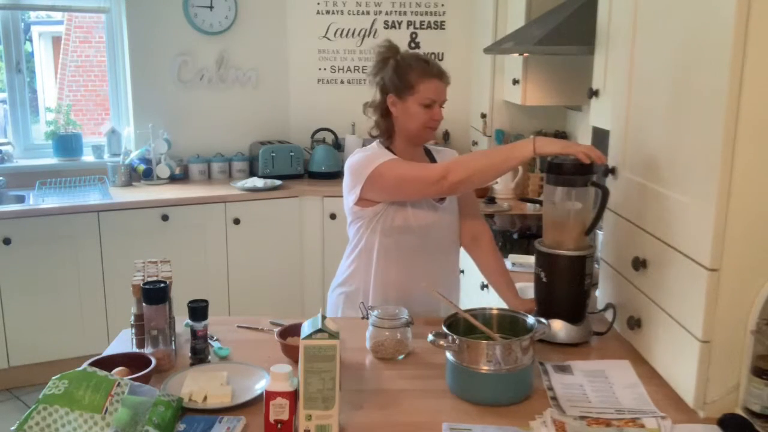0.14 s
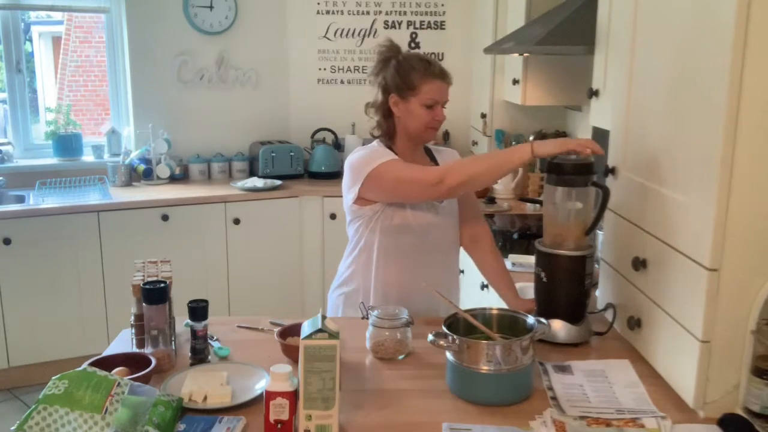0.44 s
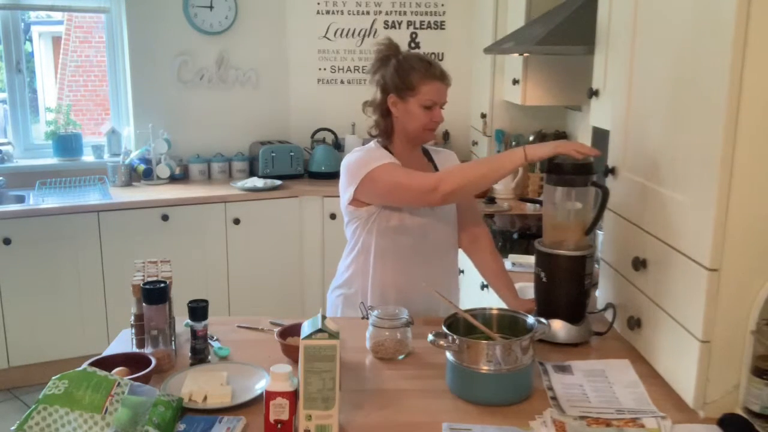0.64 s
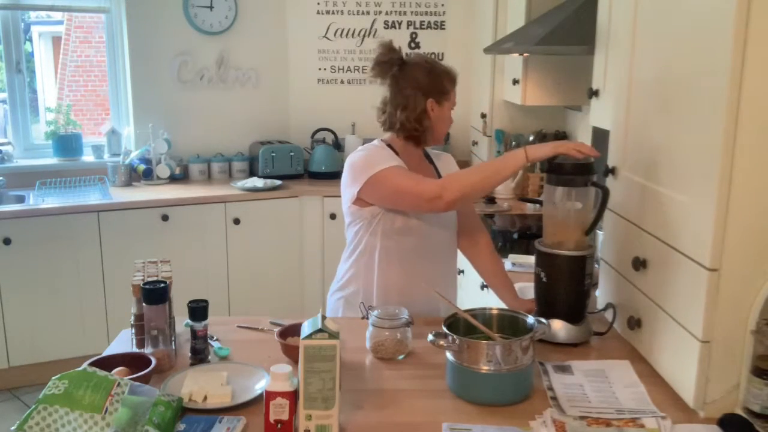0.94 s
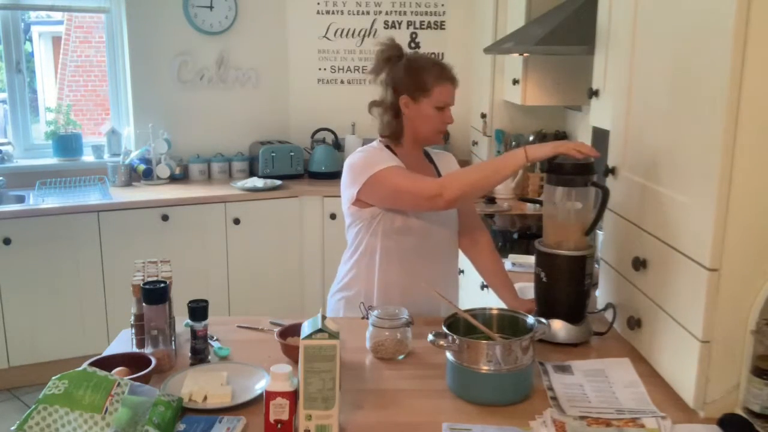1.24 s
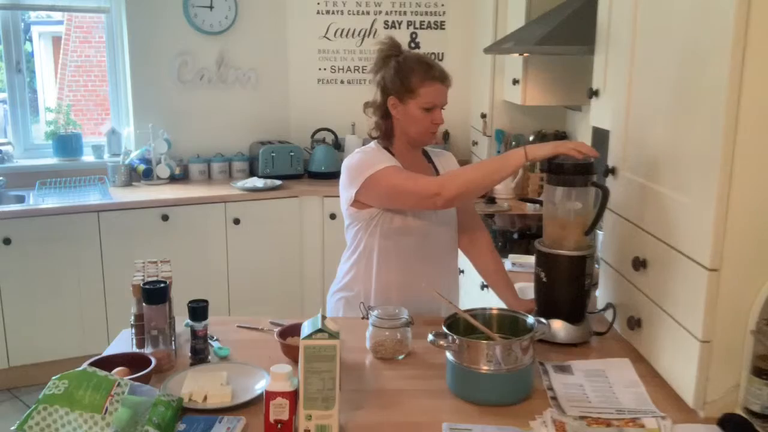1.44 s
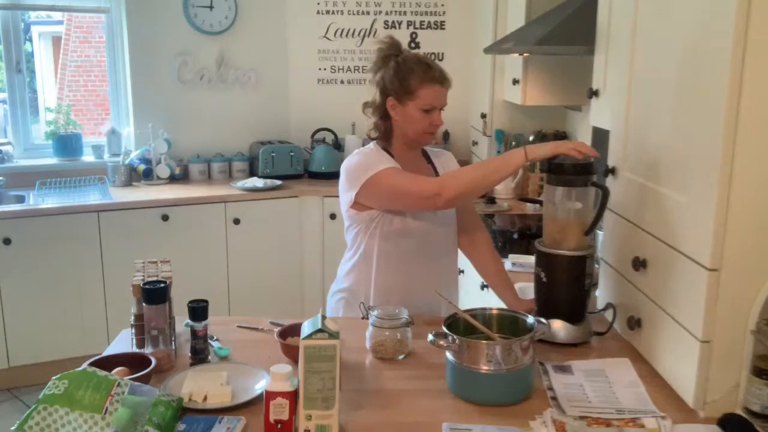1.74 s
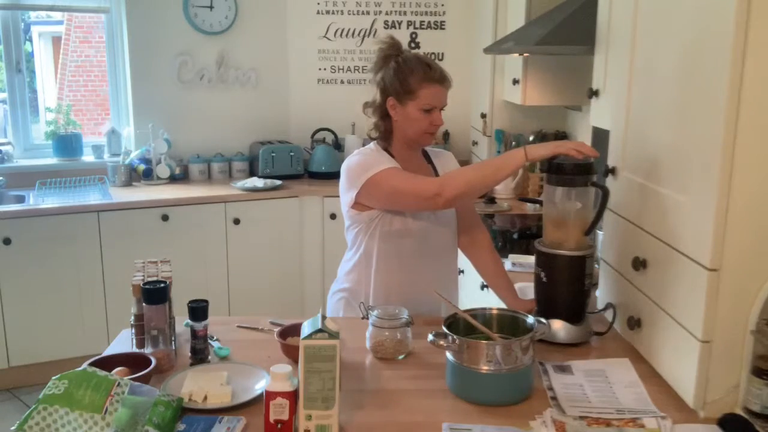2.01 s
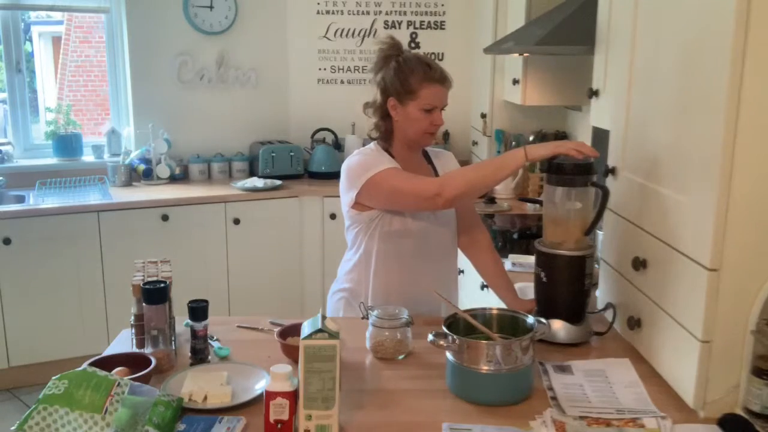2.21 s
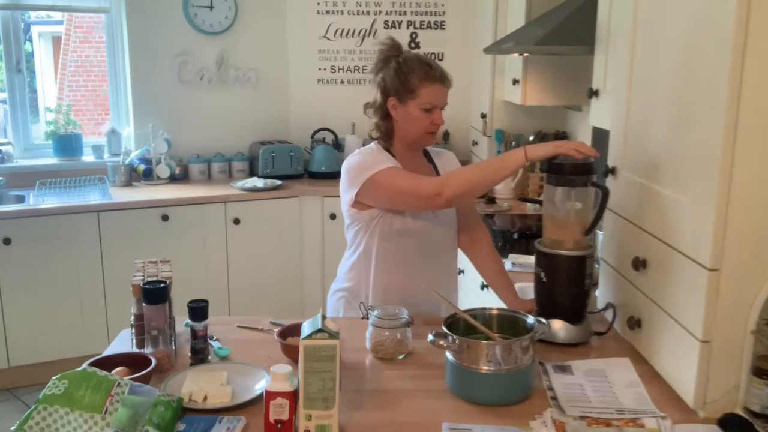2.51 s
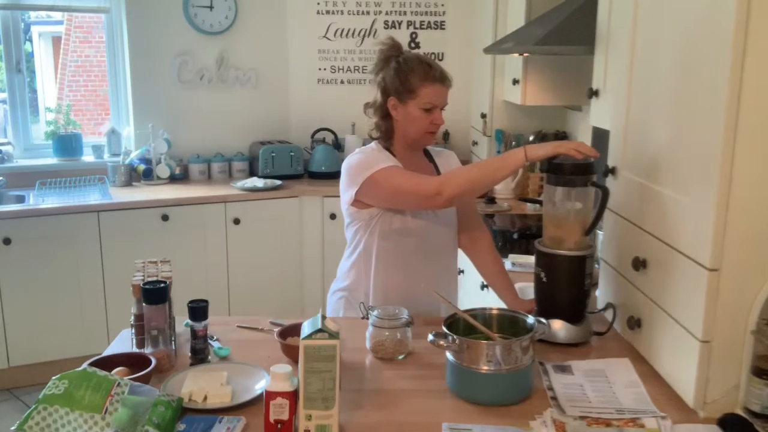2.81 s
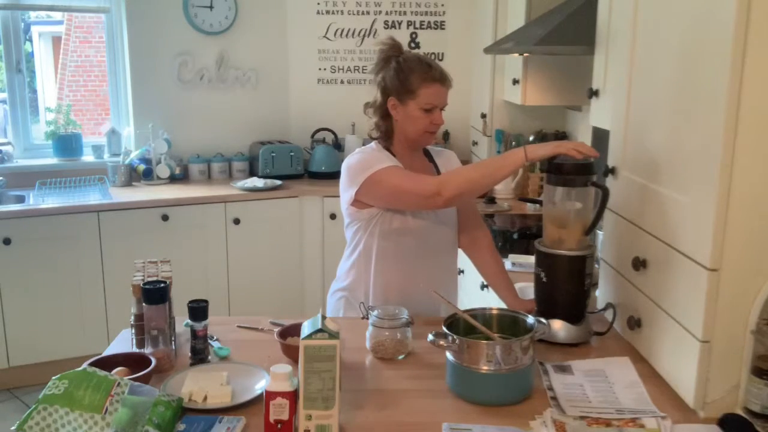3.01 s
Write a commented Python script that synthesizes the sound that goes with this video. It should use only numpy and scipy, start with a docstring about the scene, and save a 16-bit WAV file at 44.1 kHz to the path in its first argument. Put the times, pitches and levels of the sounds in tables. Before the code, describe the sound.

A kitchen blender grinds dry seeds: its whine flutters raggedly and rises in pitch during the first second, then holds nearly steady over rushing air and gritty rattle, heard in stereo in a small room.

```python
"""Small blender grinding dry seeds

A blender runs up to full speed in a kitchen; its blades whine as a fluttering sine with three overtones.
The motor adds thinner fading tones and a high whistle, all locked to the same changing speed.
Shaped noise makes the rush of air and fine meal; random clicks make the coarse seeds, loudest at first.
Two fading low tones hum faintly underneath, and one soft low thud is a short dying sine.
"""
import sys
import numpy as np
from scipy import signal
from scipy.fft import rfft, irfft
from scipy.io import wavfile

SR = 44100
rng = np.random.default_rng(int(sys.argv[2]) if len(sys.argv) > 2 else 0)


def wav_out(sig):
    """Save sig, one row per channel (or a flat mono array), as 16-bit PCM at SR to the path in sys.argv[1]."""
    wavfile.write(sys.argv[1], SR, np.round(np.clip(np.atleast_2d(sig).T, -1, 1) * 32767).astype(np.int16))


N = 138915  # length in samples

# The shifting load makes the speed waver. Each row: time in seconds, pitch added to the whine in Hz.
LOAD_WAVER = [(.98, 0), (1.09, 1.8), (1.16, -1.4), (1.65, -.8), (1.73, 3.2), (1.82, 0), (1.96, -4.2),
              (2.13, 1.4), (2.18, -2.4), (2.33, -2.5), (2.53, 2), (2.79, -3.8), (2.85, -.2), (2.94, .9),
              (3.05, -3.8), (3.11, 1)]
START_HZ, FREE_HZ, HELD_HZ = 735, 857.5, 849.3  # pitch at the start, free-running, and once held
SPIN_UP_S = .385  # time constant of the rise
JITTER_HZ, JITTER_PER_S = .45, 16


def spin_up():
    """Pitch of the whine in Hz: it rises ever slower towards free running, is held, and wavers."""
    t = np.arange(N) / SR
    rise = FREE_HZ - (FREE_HZ - START_HZ) * np.exp(-t / SPIN_UP_S)
    held = np.minimum(rise, HELD_HZ)
    return held + in_time(LOAD_WAVER) + JITTER_HZ * drift(JITTER_PER_S)


# Loudness of the whine. Each row: time in seconds, rms level in dB.
WHINE_LEVEL = [(0, -32), (.028, -30.5), (.05, -38), (.072, -46), (.1, -39), (.118, -31), (.15, -29.3),
               (.185, -34), (.213, -48), (.245, -30), (.35, -26.5), (.55, -24.8), (.62, -26.5), (.665, -30),
               (.74, -28.5), (.81, -32.5), (1.07, -30), (2.0, -31.4), (2.5, -30.2), (3.15, -30.6)]
# The whine's place shifts with its pitch. Each row: pitch in Hz, left minus right in dB.
WHINE_PAN = [(735, -.3), (835, 1.2), (840, -1.6), (846.5, 0), (848.3, 3.4)]
# Loudness of its second, third and fourth harmonics. Each row: time in seconds, rms level in dB.
OCTAVE_LEVEL = [(0, -49), (.46, -44), (.7, -37.5), (.93, -38), (1.03, -53), (1.6, -56), (2.0, -47),
                (3.15, -48.5)]
THIRD_LEVEL = [(0, -44), (.33, -47), (.42, -37), (.5, -44), (.9, -57), (1.02, -42.5), (1.5, -44),
               (3.15, -43.5)]
FOURTH_LEVEL = [(.73, -56), (.8, -44), (.95, -43), (1.1, -48), (1.25, -55), (3.15, -51.5)]
OCTAVE_PAN_DB, THIRD_PAN_DB, FOURTH_PAN_DB = -0.5, -4, -5  # left minus right
WHINE_FLUTTER, FLUTTER_PER_S = 0.058, 35  # lasting depth as a share of the level, and its rate
START_FLUTTER, SETTLE_S = .35, .17  # extra depth: the whine flutters more raggedly during the run-up
OVERTONE_UNSTEADY, OVERTONE_FADES_PER_S = .55, 24


def blades(speed, phase):
    """The blades sound one strong sine, fluttering at random, most strongly at first, with harmonics."""
    t = np.arange(N) / SR
    depth = WHINE_FLUTTER + START_FLUTTER * np.exp(-(t / SETTLE_S) ** 2)
    common = drift(FLUTTER_PER_S)
    each_side = np.array([drift(FLUTTER_PER_S), drift(FLUTTER_PER_S)])
    flutter = 1 + depth * (common + .4 * each_side)
    whine = rms_one(flutter * np.sin(phase))
    out = whine * from_db(in_time(WHINE_LEVEL)) * panned(at_hz(WHINE_PAN, speed))
    overtones = [(2, OCTAVE_LEVEL, OCTAVE_PAN_DB), (3, THIRD_LEVEL, THIRD_PAN_DB),
                 (4, FOURTH_LEVEL, FOURTH_PAN_DB)]
    for harmonic, level, pan_db in overtones:
        tone = unsteady_tone(harmonic * phase, OVERTONE_UNSTEADY, OVERTONE_FADES_PER_S)
        out = out + tone * from_db(in_time(level)) * panned(pan_db)
    return out


# Thinner motor tones. Each row: multiple of the whine's pitch, rms level in dB at the held speed,
# left minus right in dB, unsteadiness from 0 to 1 (anything over 0.75 acts as 0.75).
MOTOR_LINES = [(.875, -57.5, 8, 0.9), (1.04, -53, -14, 1), (1.255, -58.5, -28, 0.88), (1.405, -56, 7, 1),
               (1.7555, -46, 5.5, 0.46), (1.7468, -49.5, -6, 1), (2.603, -47.5, 0, 0.9),
               (3.452, -50.5, 2, 1), (5.395, -61.5, -12, 1), (10.26, -51.5, -3, .9), (13.01, -53.5, -27, 1),
               (17.585, -56, 1, 0.7)]
LINE_FADES_PER_S = 15
MOTOR_DB_PER_HZ = 0.26  # the tones grow as the speed rises


def motor(speed, phase):
    """The motor's wavering tones follow the speed, two close ones beating."""
    tones = 0
    for multiple, db, pan_db, unsteady in MOTOR_LINES:
        tone = unsteady_tone(multiple * phase, unsteady, LINE_FADES_PER_S)
        tones = tones + tone * from_db(db) * panned(pan_db)
    return tones * from_db(MOTOR_DB_PER_HZ * (speed - HELD_HZ))


# Whistle between its flares. Each row: time in seconds, level in dB.
WHISTLE_LEVEL = [(0, -56), (1.4, -52), (2.28, -63), (2.4, -47.5), (3.15, -50)]
# Flares added to it in power. Each row: time in seconds, the flare's own peak in dB,
# half-length in seconds (to 1/e of its power).
WHISTLE_FLARES = [(.04, -48, 0.019), (.36, -46, 0.057), (.51, -45, 0.049), (.65, -43.5, 0.023),
                  (0.778, -43.5, 0.055), (0.94, -41, 0.024), (1.198, -48, .018), (1.78, -39, 0.011),
                  (1.955, -39, .025), (2.12, -43, .03), (2.55, -43, 0.044)]
WHISTLE_MULTIPLE, WHISTLE_UNSTEADY, WHISTLE_FADES_PER_S = 13.19, .6, 35


def whistle(phase):
    """The motor's high whistle rises with the speed and flares up in short bursts."""
    t = np.arange(N) / SR
    power = from_db(in_time(WHISTLE_LEVEL)) ** 2
    for peak_s, db, half_s in WHISTLE_FLARES:
        power = power + from_db(db) ** 2 * np.exp(-((t - peak_s) / half_s) ** 2)
    tone = unsteady_tone(WHISTLE_MULTIPLE * phase, WHISTLE_UNSTEADY, WHISTLE_FADES_PER_S)
    return np.sqrt(power) * tone


# Colour of the rush. Each row: frequency in Hz, relative density in dB per Hz.
RUSH_COLOUR = [(25, -42), (45, -35), (75, -17.5), (120, -23), (200, -22), (230, -25.5), (320, -21),
               (440, -20), (490, -17.5), (620, -6), (680, -4.5), (712, -8.5), (770, -4), (930, -6),
               (1060, -3), (1130, -11), (1300, -12.5), (1500, -4.5), (1800, -4), (2000, -4.5), (2300, 0),
               (2600, -2.5), (3100, -7), (3800, -13.5), (4400, -6.5), (5000, -9), (5400, -5), (6000, -6),
               (7600, -5.5), (9000, -7.5), (9700, -9), (12500, -12), (14000, -11.5), (15700, -12)]
RUSH_DB, BLADE_CHOP = -32.5, 0.14  # rms level; depth of the chop as a share of the flow
RUSH_FLICKER_DB, RUSH_FLICKERS_PER_S = .3, 22


def rush(phase):
    """Air and fine meal whirl round the jug: noise lightly chopped at the pitch of the blades."""
    flicker = from_db(RUSH_FLICKER_DB * drift(RUSH_FLICKERS_PER_S))
    chop = 1 + BLADE_CHOP * np.sin(phase)
    noise = rng.standard_normal((2, N)) * flicker * chop
    return from_db(RUSH_DB) * coloured(kitchen(noise), RUSH_COLOUR)


# Loudness of the coarse seeds. Each row: time in seconds, gain in dB.
COARSE_LEVEL = [(0, -34.5), (.22, -36.5), (.3, -34), (.37, -41), (.43, -35), (.5, -42), (.95, -42.5),
                (1.2, -45.5), (3.15, -43)]
# Colour of their rattle. Each row: frequency in Hz, relative density in dB per Hz.
COARSE_COLOUR = [(200, -34), (700, -12.5), (1400, -2.5), (2200, -8.5), (3000, -5), (3600, 2.5), (4300, -4),
                 (5000, -14.5), (8000, -14), (15000, -50)]
SEED_HITS_PER_S, SEED_SPREAD_DB = 5100, 2.5  # hits before the wavering, in each of two streams


def seeds():
    """Coarse seeds pelt the jug as random clicks, quieter as they are ground down."""
    strength_db = SEED_SPREAD_DB * np.minimum(rng.exponential(1, (2, N)), 5)
    clicks = from_db(strength_db) * rng.choice([-1, 1], (2, N))
    hits_per_s = SEED_HITS_PER_S * from_db(2 * drift(25))
    hits = rng.random((2, N)) < hits_per_s / SR
    return from_db(in_time(COARSE_LEVEL)) * coloured(kitchen(clicks * hits), COARSE_COLOUR)


THUD_S, THUD_HZ, THUD_DB, THUD_T60_S = 0.96, 80, -53, .13  # start, pitch, starting level, 60 dB decay


def thud():
    """One soft low thud: a sine that dies away at once."""
    t = np.maximum(np.arange(N) / SR - THUD_S, 0)  # held at 0, so silent, until the thud
    return from_db(THUD_DB - 60 * t / THUD_T60_S) * np.sin(2 * np.pi * THUD_HZ * t)


# Faint low hum. Each row: frequency in Hz, level in dB.
HUM = [(75, -75), (102, -70)]


def hum():
    """Steady pitches with slightly fading levels, alike on both sides."""
    t = np.arange(N) / SR
    tones = 0
    for hz, db in HUM:
        one_side = unsteady_tone(2 * np.pi * hz * t, 0.36, LINE_FADES_PER_S)[0]
        tones = tones + from_db(db) * one_side
    return tones


KITCHEN_T60_S, ECHO_DB = 0.18, -7  # 60 dB decay; reflections against the direct sound


def kitchen(pair):
    """Dense, quickly dying reflections from cupboards and walls, as decaying noise."""
    t = np.arange(SR // 2) / SR
    tail = rng.standard_normal((2, len(t))) * from_db(-60 * t / KITCHEN_T60_S)
    tail /= np.sqrt(np.sum(tail ** 2, axis=1, keepdims=True))
    return pair + from_db(ECHO_DB) * signal.fftconvolve(pair, tail, axes=1)[:, :N]


# Stereo width. Each row: frequency in Hz, likeness of left and right (1 is identical).
LIKENESS = [(90, .998), (160, .94), (400, .91), (750, .94), (1200, .72), (2600, .56), (3400, .1),
            (5800, .42), (7000, .18), (9000, .35), (11000, .2), (14000, .72)]
# Stereo balance. Each row: frequency in Hz, left minus right in dB.
BALANCE_DB = [(500, -0.5), (1400, -3), (2400, -4), (4000, -2), (8000, -1), (15000, -1)]
# Phase by which the left side leads. Each row: frequency in Hz, lead in radians.
LEAD = [(700, 0), (1500, -.3), (3000, 0), (4300, -2.3), (6200, -2.7), (7500, -4.5), (10700, -4.7),
        (11300, -7.5), (14000, -6.3), (15500, -4.8)]


def coloured(pair, spectrum):
    """Filter two unrelated signals into one stereo sound of the given colour; rms 1."""
    hz = np.arange(N + 1) * SR / (2 * N)
    mid, side = rfft(pair, 2 * N)
    alike = np.clip(at_hz(LIKENESS, hz), -.999, .999)
    both = np.sqrt(1 + alike) * mid + np.sqrt(1 - alike) * side * [[1], [-1]]
    lead = np.exp(1j * at_hz(LEAD, hz) * [[1], [0]])
    place = panned(at_hz(BALANCE_DB, hz)) * lead
    return rms_one(irfft(both * from_db(at_hz(spectrum, hz)) * place)[:, :N])


def unsteady_tone(phase, unsteady, fades_per_s):
    """A tone, part steady and part fading at random, a little differently on each side; rms 1."""
    share = np.clip(unsteady, 0, .75)
    fades = np.array([drift(fades_per_s) + 1j * drift(fades_per_s) for _ in range(3)])
    fading = .5 * (fades[0] + fades[1:])  # one common fade plus one for each side
    swing = np.sqrt(1 - share ** 2) + share * fading
    return rms_one(np.real(swing * np.exp(1j * phase)))


def drift(rate):
    """Smooth random wandering of rms 1: noise through two equal low-pass poles at rate Hz."""
    step = 40  # drawn at every 40th sample, then interpolated
    pole = np.exp(-2 * np.pi * rate * step / SR)
    noise = rng.standard_normal(N // step + 2002)
    slow = signal.lfilter([1], [1, -2 * pole, pole ** 2], noise)[2000:]  # drop the filter's start
    return np.interp(np.arange(N) / step, np.arange(len(slow)), rms_one(slow))


def panned(db):
    """Left and right gains for a level difference, at constant power."""
    gains = from_db(np.array([[.5], [-.5]]) * db)
    return gains / np.sqrt(np.mean(gains ** 2, axis=0))


def in_time(rows):
    """A control curve at every sample, straight between its points."""
    return np.interp(np.arange(N) / SR, *np.transpose(rows))


def at_hz(points, hz):
    """Read a table on a log-frequency axis."""
    table = np.array(points)
    return np.interp(np.log(hz + 1), np.log(table[:, 0]), table[:, 1])


def from_db(db):
    """Decibels to gain."""
    return 10 ** (np.asarray(db) / 20)


def rms_one(x):
    """Scale to unit power."""
    return x / np.sqrt(np.mean(x ** 2) + 1e-20)


def scene():
    """One speed drives blades, motor, whistle and rush; seeds, thud and hum run on their own."""
    speed = spin_up()
    phase = 2 * np.pi * np.cumsum(speed) / SR
    machine = blades(speed, phase) + motor(speed, phase) + whistle(phase)
    return machine + rush(phase) + seeds() + thud() + hum()


CUTOFF_HZ = 15780


def record(dry):
    """A steep linear-phase low-pass cuts the top."""
    low_pass = signal.firwin(801, CUTOFF_HZ, fs=SR, window="blackman")
    return signal.fftconvolve(dry, low_pass[None], "same", axes=1)


dry = scene()
out = record(dry)
wav_out(out)
```